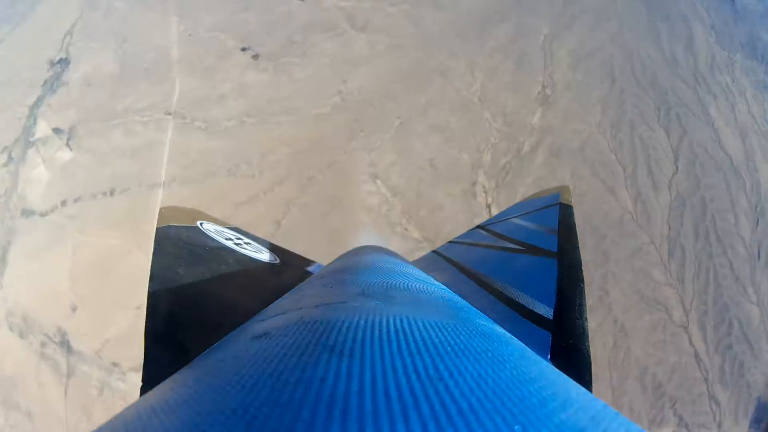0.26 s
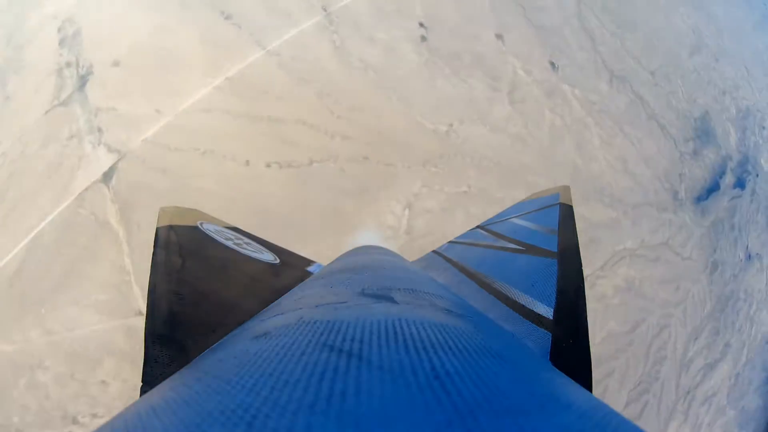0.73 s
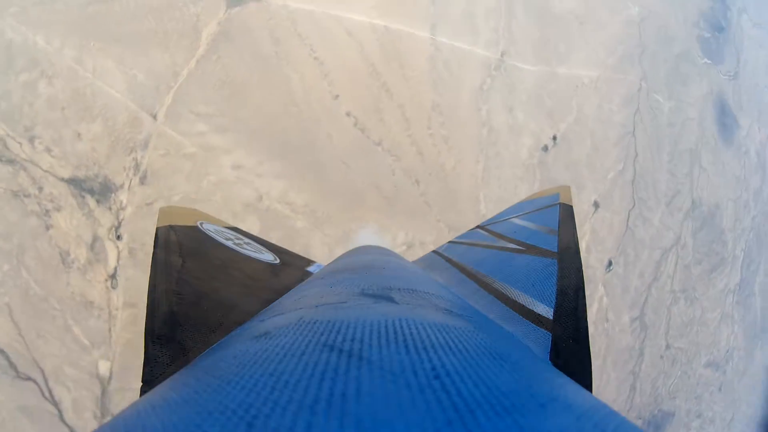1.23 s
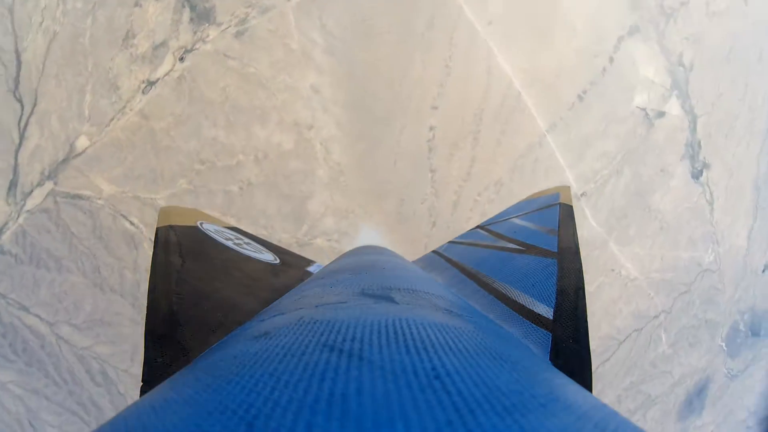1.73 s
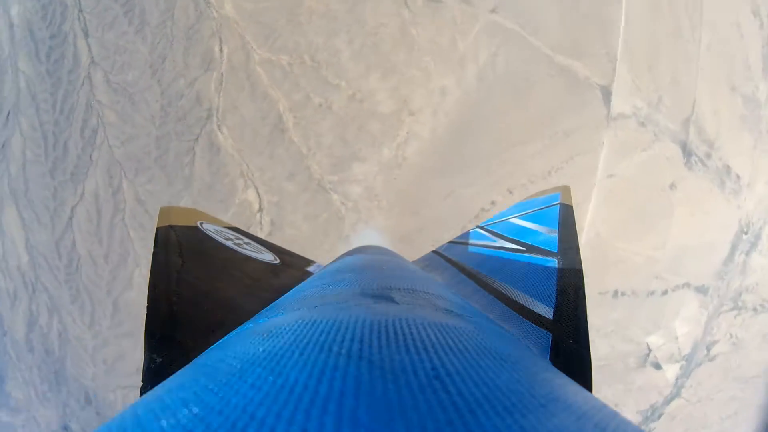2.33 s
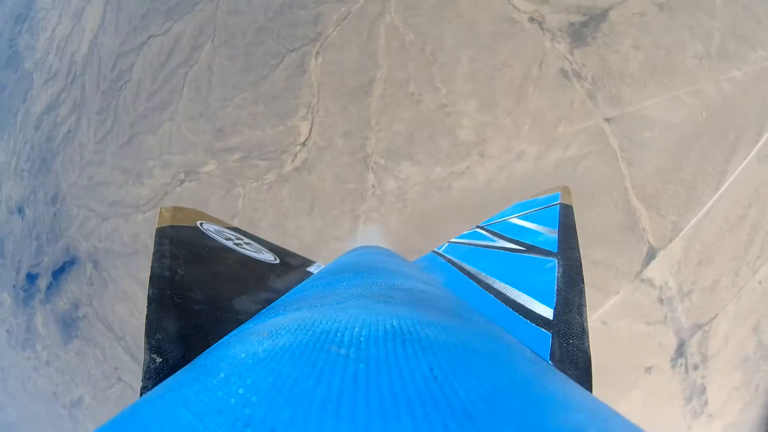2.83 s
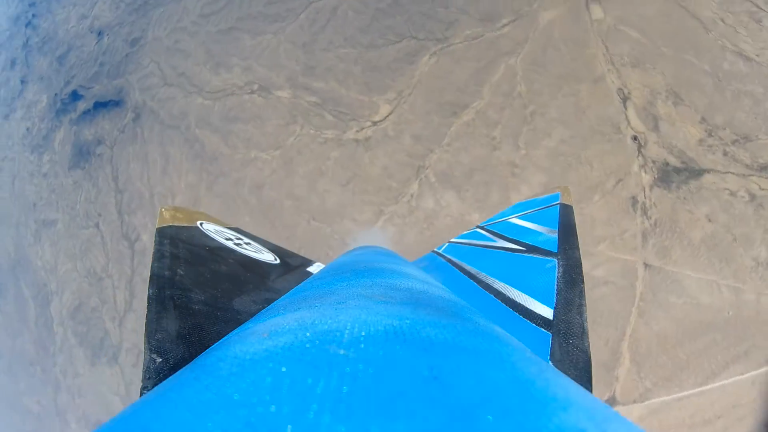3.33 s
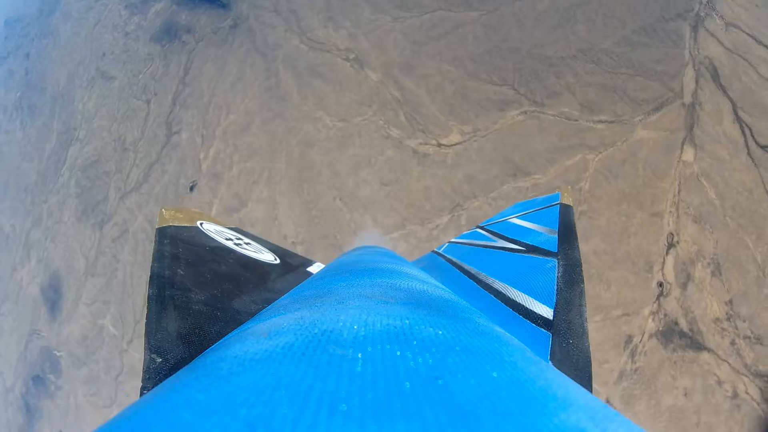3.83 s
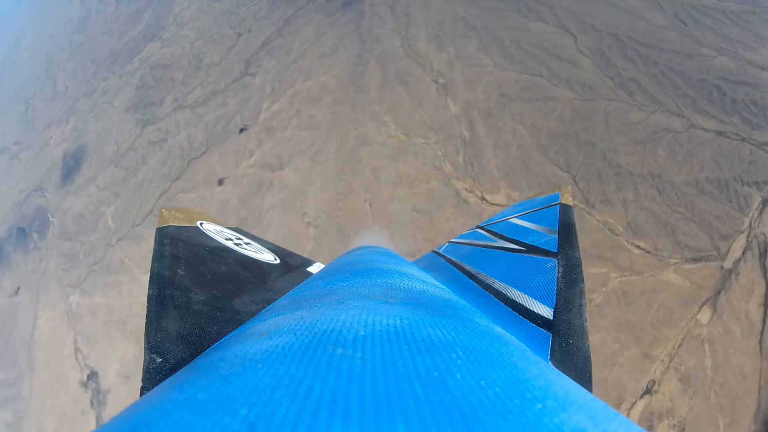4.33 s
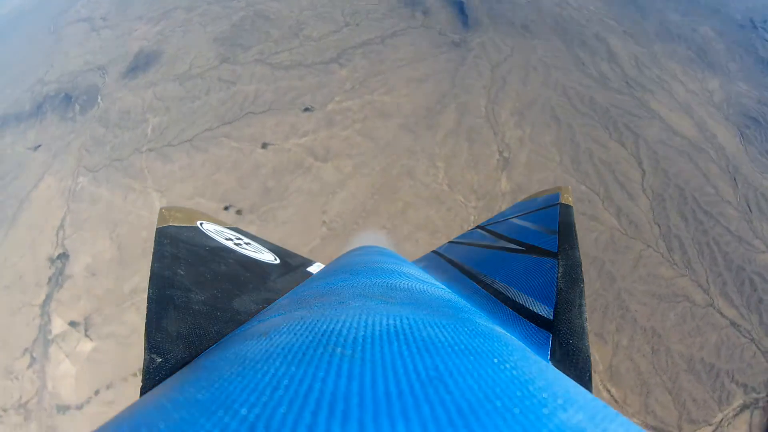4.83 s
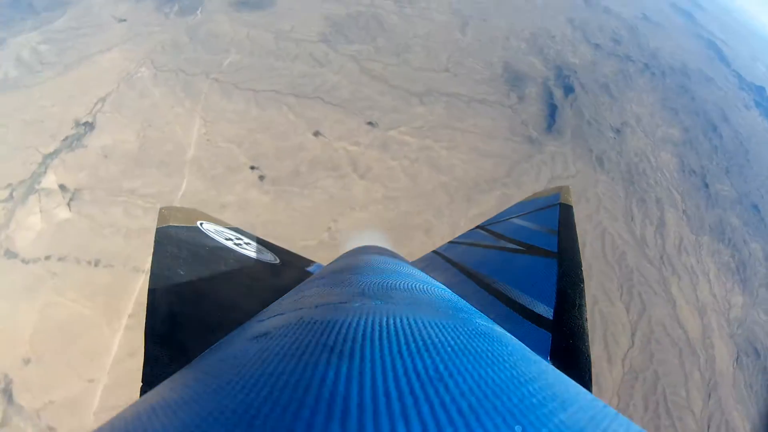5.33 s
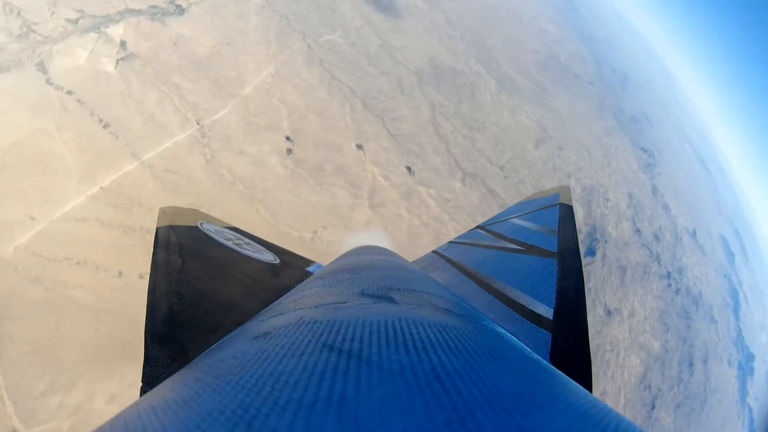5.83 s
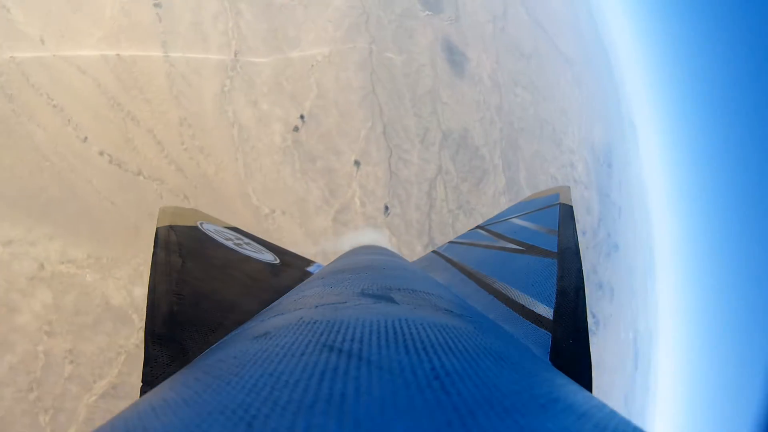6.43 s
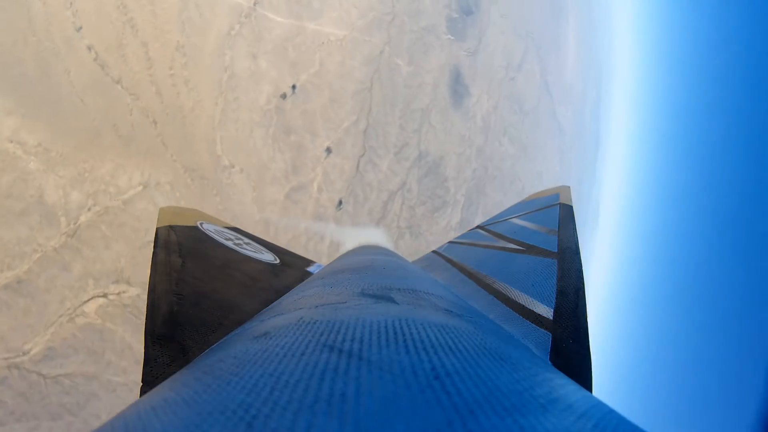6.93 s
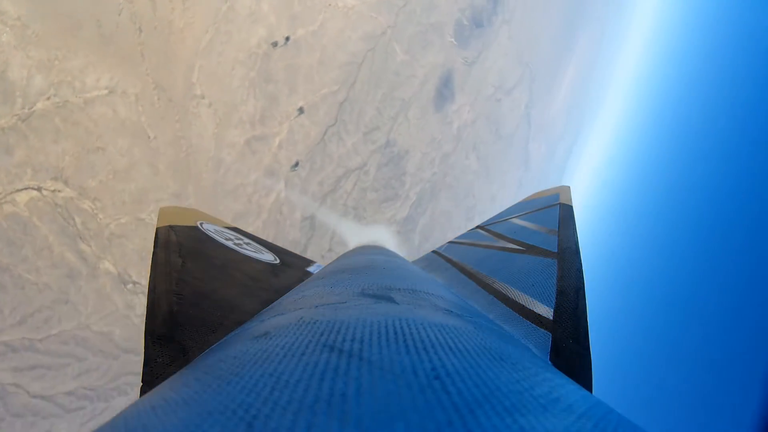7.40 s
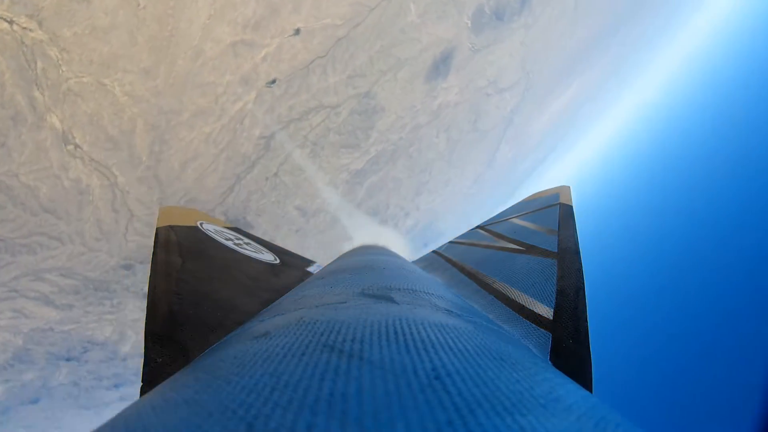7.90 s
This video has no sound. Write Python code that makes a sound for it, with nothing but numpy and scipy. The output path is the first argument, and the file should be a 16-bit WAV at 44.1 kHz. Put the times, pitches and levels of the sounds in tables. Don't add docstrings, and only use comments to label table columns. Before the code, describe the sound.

From 0 to about 1.5 seconds, violent slipstream over a rocket's tube fills the onboard microphone: a thick roar centred around a few hundred hertz, a broad noisy whistle near one kilohertz, and muffled, band-limited treble. The input is overloaded, so peaks flip into dense, dull crackling jolts. Tiny digital dropouts, some tens of milliseconds long, hollow the top and leave faint watery tones. From 1.5 to 3.3 seconds the wind eases while the whistle briefly holds strong and the jolts thin out. Separate dull pops continue until about 4 seconds, then cease. From 4 to 7 seconds the roar falls smoothly, with slight gusts and flutters near 4.7, 5.4 and 6.3, and rare glitches. By 7.5 only a quiet, thin airy hiss and low rumble remain. At 8.1 one short, dry, damped knock hits the airframe. No echo.

```python
import sys
import numpy as np
from scipy import signal
from scipy.fft import rfft, irfft, next_fast_len
from scipy.io import wavfile
from scipy.ndimage import minimum_filter1d, map_coordinates

SR = 44100
rng = np.random.default_rng(int(sys.argv[2]) if len(sys.argv) > 2 else 0)


def gain_from_decibels(decibels):
    exponent = np.asarray(decibels, float) / 20
    return 10 ** exponent


def store_pcm(level_fs):
    pcm = np.round(np.clip(level_fs, -1, 1) * 32767).astype(np.int16)
    wavfile.write(sys.argv[1], SR, np.atleast_2d(pcm).T)


N = 359856
CALM_S = 3.3


def unit(x):
    return x / np.sqrt(np.mean(x ** 2) + 1e-20)


def along(points, hz):
    f, v = np.transpose(points)
    return np.interp(np.log(hz + 1), np.log(f + 1), v)


def wobble(rate_hz):
    knots = rng.standard_normal(int(N * rate_hz / SR) + 4)
    return map_coordinates(knots, [np.arange(N) * rate_hz / SR])


def filtered(x, response):
    m = next_fast_len(len(x) + 8192)
    return irfft(rfft(x, m) * response(np.fft.rfftfreq(m, 1 / SR)), m)[:len(x)]


def rush(colour):
    return unit(filtered(rng.standard_normal(N), lambda hz: gain_from_decibels(along(colour, hz))))


# [t/s, level/dB]
WIND_PRESSURE = [(0, -1), (.8, -1.5), (1.6, -4), (2.4, -7.5), (3, -10.5), (3.499, -13), (4, -16),
                 (4.5, -18), (5, -20.5), (5.4, -23), (5.75, -25), (6.3, -28), (7, -31), (7.5, -35.5),
                 (8.16, -39)]


def wind_db():
    return np.interp(np.arange(N) / SR, *np.transpose(WIND_PRESSURE))


def answer_db(wind, law):
    full_db, knee_db, grows, width_db, bed_db = law
    level_db = full_db - grows * width_db * np.logaddexp(0, (knee_db - wind) / width_db)
    return 10 * np.log10(gain_from_decibels(2 * level_db) + gain_from_decibels(2 * bed_db))


# [t/s, level/dB, length/s]
GUSTS = [(1.41, 2, 0.014), (3.03, -1, 0.017), (3.426, 0, .03), (3.487, -2.5, .03), (4.024, 2, .03),
         (4.05, -2, 0.017), (4.694, -3, 0.0073), (4.707, 4, .008), (5.36, 3.5, 0.014), (5.38, -4, 0.025),
         (5.43, 1.5, 0.02), (5.978, -3, 0.02), (6.318, 2.5, .03), (6.443, -0.5, .04), (6.996, 0.5, 0.098),
         (7.64, -1, .04)]


def gusts_db():
    t = np.arange(N) / SR
    return sum(db * np.exp(-((t - s) / length_s) ** 2) for s, db, length_s in GUSTS)


# [f/Hz, level/dB per Hz]
ROAR = [(20, -42.5), (60, -37.5), (120, -23.5), (220, -7.5), (420, -0.5), (620, -2), (900, -8),
        (1600, -21.5), (3000, -48.5)]
# [full level/dB, knee wind/dB, slope/(dB/dB), knee width/dB, bed level/dB]
ROAR_LAW = (-13, -12, 0.9865, 3, -45.5)


def roar(wind, gust_db, eddies):
    dull_hz, dull_at_db, dull_grows = 299, -26, .035
    flutter_db = 0.42 - 0.0086 * wind
    body = rush(ROAR)
    bottom = filtered(body, lambda hz: 1 / (1 + (hz / dull_hz) ** 4))
    body = body + np.clip(dull_grows * (dull_at_db - wind), -.35, .35) * bottom
    return gain_from_decibels(answer_db(wind, ROAR_LAW) + gust_db + flutter_db * eddies) * body


# [f/Hz, level/dB per Hz]
SHROUD = [(150, -39.5), (400, -12), (800, -0.5), (1250, -2), (1600, -5.5), (2100, -20.5), (3500, -39)]
# [full level/dB, knee wind/dB, slope/(dB/dB), knee width/dB, bed level/dB]
SHROUD_LAW = (-10.5, -11.5, 1.9, 1.5, -42)


def shroud(wind, gust_db, eddies):
    best_wind_db, span_db, whistle_gain_db = -9.5, 2.5, 1.5
    whistle_db = whistle_gain_db * np.exp(-((wind - best_wind_db) / span_db) ** 2)
    level_db = answer_db(wind, SHROUD_LAW) + whistle_db + 0.74 * gust_db + .6 * eddies
    return gain_from_decibels(level_db) * rush(SHROUD)


# [f/Hz, level/dB per Hz]
HISS = [(500, -25.5), (1200, -7), (2000, 0.5), (2800, -6.5), (3600, -10), (5000, -25.5), (8000, -47.5)]
# [full level/dB, knee wind/dB, slope/(dB/dB), knee width/dB, bed level/dB]
HISS_LAW = (-17.5, -4.5, 1.53, 1.5, -53)


def hiss(wind, gust_db):
    level_db = answer_db(wind, HISS_LAW) + 0.36 * gust_db + 0.65 * wobble(40)
    return gain_from_decibels(level_db) * rush(HISS)


# [f/Hz, level/dB per Hz]
SIZZLE = [(1500, -28.5), (2600, -4), (3600, -1), (4800, 0), (5600, -9), (8000, -20), (16000, -33)]
# [f/Hz, level/dB per Hz]
SPRAY = [(3500, -30), (5200, -5.5), (6500, 1.5), (9000, -2.5), (12000, -2), (16000, -6)]


def fine_eddies(wind):
    spray = gain_from_decibels(-17.5 + 1.255 * wind) * rush(SPRAY)
    return gain_from_decibels(-22 + wind) * rush(SIZZLE) + spray


def slipstream():
    wind, gust_db, eddies = wind_db(), gusts_db(), wobble(30)
    large = roar(wind, gust_db, eddies) + shroud(wind, gust_db, eddies)
    return large + hiss(wind, gust_db) + fine_eddies(wind)


# [t/s, signed size]
JOLTS = [(3.3154, -0.21), (3.3382, .43), (3.3708, -0.29), (3.3883, -0.34), (3.4312, -0.25), (3.4443, .53),
         (3.4853, -.33), (3.5114, -.225), (3.5288, 0.34), (3.5361, 0.49), (3.5668, -0.23), (3.5994, -0.19),
         (3.6306, 0.19), (3.6573, -0.28), (3.6754, 0.15), (3.7043, 0.59), (3.7327, -0.21), (3.7512, -.28),
         (3.7936, -.25), (3.821, -0.13), (3.8518, -.33), (3.8612, -0.4), (3.8801, -0.17), (3.9362, 0.17),
         (3.9438, 0.1), (3.9539, -0.19), (4.0247, -0.31)]


def jolts():
    count, max_size, thinning_s = 26, .22, .2
    when, size = rng.random((count, 2)).T
    times_s = CALM_S - thinning_s * np.log(1 - .92 * when)
    return list(JOLTS) + list(zip(times_s, max_size * (2 * size - 1)))


def overflow(x, limit, offset, depth, area_s, width_s, surge):
    over = (np.abs(x + offset) > limit) * (np.arange(N) < CALM_S * SR)
    flips = -depth * np.sign(x) * over
    reach, surges = SR // 1000, np.zeros(N)
    for s, size in jolts():
        start = round(s * SR) - reach
        peak = start + np.argmin(size * x[start:start + 2 * reach])
        flips[peak] = size * area_s * SR
        surges[start] = surge * np.abs(size)
    x = x * (1 + np.convolve(surges, np.hanning(10 * reach), "same"))
    pulse = np.hanning(round(width_s * SR))
    flipped = x + np.convolve(flips, pulse / pulse.sum(), "same")
    return flipped / (1 + np.abs(flipped / .78) ** 6) ** (1 / 6)


# [f/Hz, level/dB]
LOWPASS = [(2800, 2), (4000, -5), (5000, -13), (5900, -21), (6300, -36), (6520, -52), (6800, -36),
           (7500, -34.5), (9000, -34.5), (11000, -44), (12300, -60), (12800, -77), (16000, -82.5)]


def recorder_lowpass(x):
    notch = lambda hz: 1 - 0.98 / (1 + ((hz - 700) / 11) ** 2)
    return filtered(x, lambda hz: gain_from_decibels(along(LOWPASS, hz)) * notch(hz))


# [t/s, length/s, kept up to f/Hz, leftover line f/Hz]
STARVED = [(.228, .009, 4300, 4100), (.27, .009, 3900, 3800), (.341, .043, 4000, 3950),
           (.634, .007, 4000, 3900), (.954, .008, 3300, 3600), (.993, .008, 3200, 3000),
           (1.038, .009, 3300, 3600), (1.232, .008, 4000, 3900), (1.572, .01, 3700, 3600),
           (1.635, .009, 3500, 3200), (1.805, .012, 3800, 3600), (1.977, .031, 3700, 4750),
           (2.212, .031, 3900, 4750), (2.339, .009, 3500, 3100), (2.489, .027, 3700, 3350),
           (2.594, .009, 3300, 3050), (2.703, .049, 3400, 3100), (2.853, .049, 3200, 4700),
           (3.172, .009, 3100, 2850), (3.362, .01, 2300, 3050), (3.641, .011, 2500, 2800),
           (3.896, .009, 2800, 3850), (4.727, .01, 3000, 4650), (4.983, .013, 3100, 3500),
           (5.882, .009, 2300, 2700), (6.306, .01, 2200, 4650), (7.077, .009, 2250, 2150),
           (7.372, .01, 2300, 2200)]


def starve(x):
    frame_s, band_hz = .021, 220
    sparse_from, sparse_share = .66, .62
    line_db, tilt_db_per_khz, edge_line_db = -10.5, -3, -9
    hiss_db = answer_db(wind_db(), HISS_LAW) - .2 * wind_db()
    out, edge = np.pad(x, (0, SR // 10)), round(.72 * frame_s * SR)
    draws = rng.random((len(STARVED), 124))
    for (start_s, length_s, kept_hz, line_hz), draw in zip(STARVED, draws):
        a = round((start_s + .004) * SR) - edge
        b = round((start_s + length_s - .004) * SR) + edge
        ramp = np.arange(b - a)
        gate = np.clip(np.minimum(ramp, ramp[::-1]) / edge, 0, 1)

        def lost(hz):
            hole = draw[(hz // band_hz).astype(int)] < sparse_share
            return (hz > .95 * kept_hz) | (hz > sparse_from * kept_hz) & hole

        window = signal.windows.tukey(b - a + 2 * edge, edge / (b - a))
        top = filtered(out[a - edge:b + edge] * window, lost)
        out[a:b] -= (1 - np.cos(np.pi / 2 * gate) ** 1.25) * top[edge:-edge]
        lines = [(a, b, line_hz, line_db + tilt_db_per_khz * (line_hz / 1000 - 3))]
        for k in range(round(length_s / frame_s + .2)):
            first, last = a + round(k * frame_s * SR), a + round((k + 2) * frame_s * SR)
            lines.append((first, last, kept_hz * (.97 - .1 * k - .08 * draw[-1 - k]), edge_line_db))
        for first, last, hz, db in lines:
            t = np.arange(first, last)
            out[t] += gain_from_decibels(hiss_db[a] + db) * np.hanning(len(t)) * np.sin(2 * np.pi * hz * t / SR)
    return out[:N]


# [t/s, overshoot level/dB]
FULL = [(.2376, .4), (.2405, .6), (.3434, .6), (.3456, .1), (.6358, .2), (.9932, .04), (1.0021, .6),
        (1.0047, .8), (1.2434, .06), (1.5793, .2), (1.6465, .08), (1.9697, .6), (1.9936, .08), (1.9992, .2),
        (2.2329, .55), (2.4933, .02), (2.6997, .8), (2.7161, .7)]


def full_scale(x):
    reach = SR // 1000
    needed = minimum_filter1d(np.minimum(1, .93 / (np.abs(x) + 1e-9)), 6 * reach)
    smoother = np.hanning(4 * reach + 1) / (2 * reach)
    x = x * np.convolve(np.pad(needed, 2 * reach, "edge"), smoother, "valid")
    swell = np.blackman(8 * reach + 1) + 1e-9
    for s, over_db in FULL:
        start = round(s * SR) - 2 * reach
        peak = start + np.argmax(np.abs(x[start:start + 3 * reach]))
        near = slice(peak - 4 * reach, peak + 4 * reach + 1)
        missing = gain_from_decibels(np.abs(over_db)) / (np.abs(x[near]) + 1e-9) - 1
        x[near] *= 1 + swell * np.min(missing / swell)
    return np.clip(x, -1, 1)


# [t/s, peak level/dB]
KNOCK = [
    (8.107, -15.5),
]
# [f/Hz, level/dB, t60/s]
TUBE = [(706, 7, 0.0059), (980, -5, 0.016), (1910, -18, 0.028), (2700, -25, .015), (4300, -15, .018)]


def knock():
    out, t = np.zeros(N + SR), np.arange(SR // 10) / SR
    for s, db in KNOCK:
        ring = sum(gain_from_decibels(level - 60 * t / t60) * np.sin(2 * np.pi * hz * t) for hz, level, t60 in TUBE)
        crack = gain_from_decibels(-17 - 60 * t / 0.034) * rng.standard_normal(len(t))
        attack = 1 - np.exp(-t / 0.00019)
        out[round(s * SR):][:len(t)] += gain_from_decibels(db) * (ring + crack) * attack
    return filtered(out[:N], lambda hz: hz ** 2 / (hz ** 2 + 250 ** 2))


def scene():
    return filtered(slipstream() + knock(), lambda hz: hz ** 2 / np.sqrt(hz ** 4 + 90 ** 4))[None]


def low_pass(x):
    return signal.sosfilt(signal.butter(12, 15830, fs=SR, output="sos"), x)


def record(dry):
    x = overflow(dry[0], limit=.72, offset=.03, depth=2.27, area_s=0.0018, width_s=0.0011, surge=0.7)
    x = starve(recorder_lowpass(x))
    floor = gain_from_decibels(-91.5) * rng.standard_normal(N)
    return low_pass(full_scale(x + floor)[None])


dry = scene()
out = record(dry)
store_pcm(out)
```